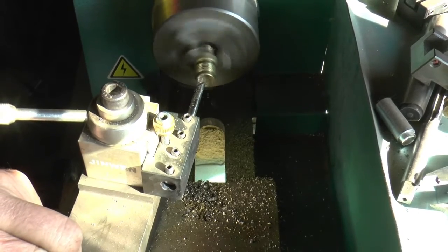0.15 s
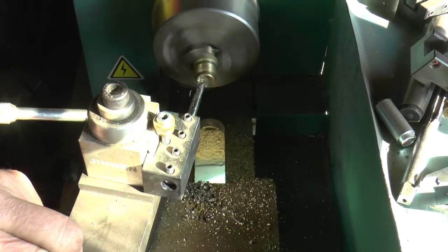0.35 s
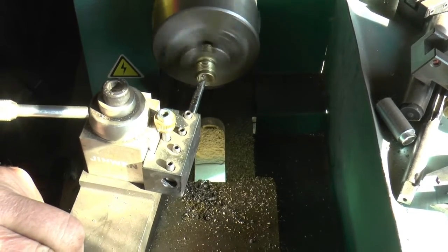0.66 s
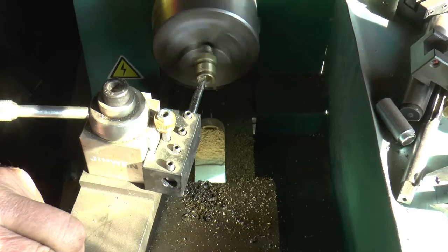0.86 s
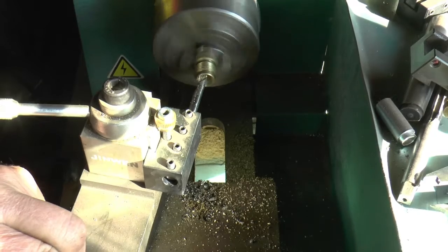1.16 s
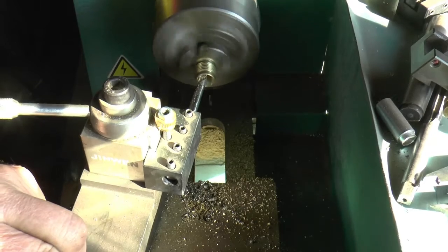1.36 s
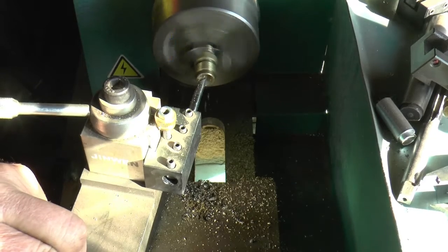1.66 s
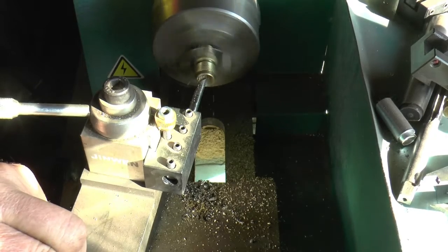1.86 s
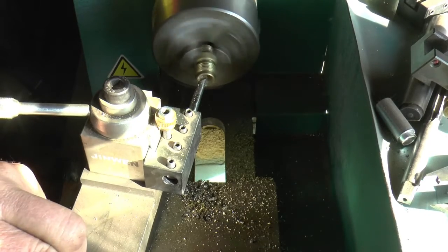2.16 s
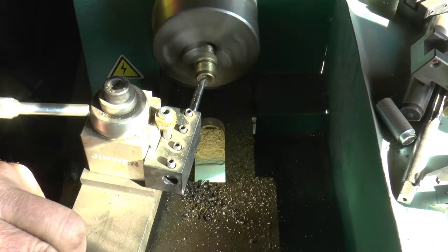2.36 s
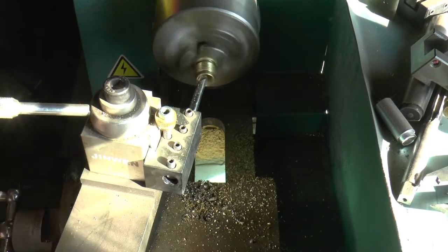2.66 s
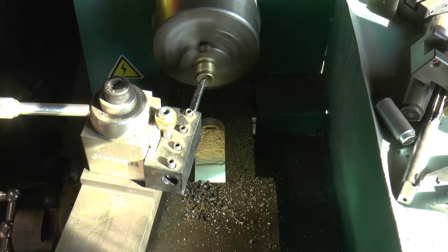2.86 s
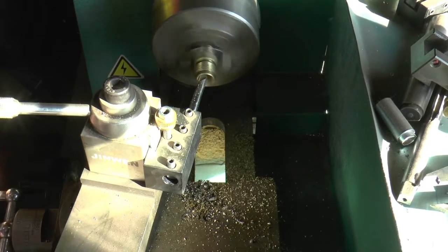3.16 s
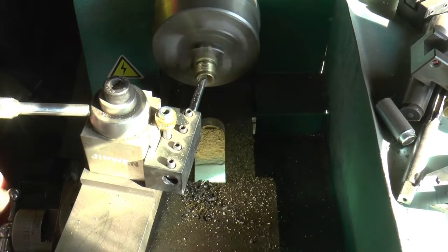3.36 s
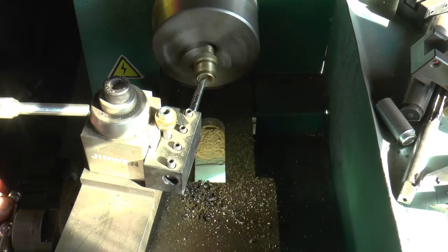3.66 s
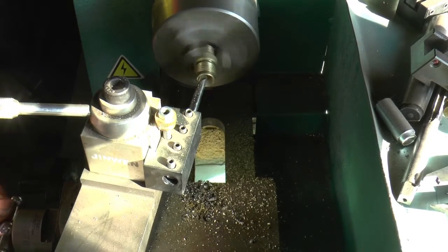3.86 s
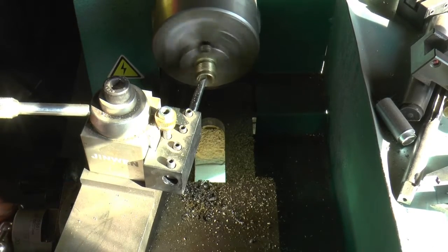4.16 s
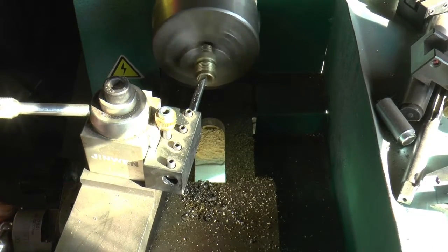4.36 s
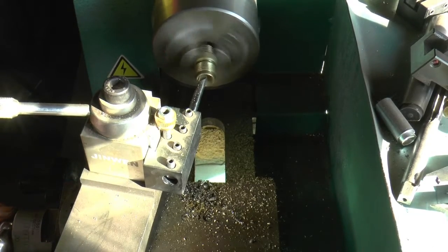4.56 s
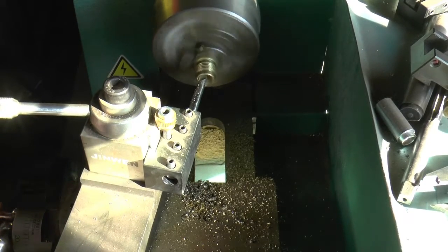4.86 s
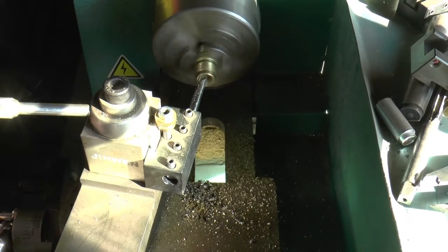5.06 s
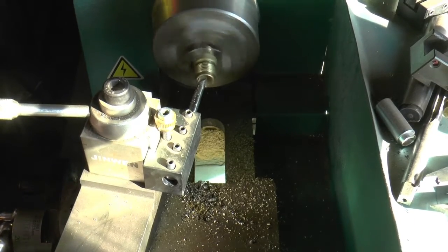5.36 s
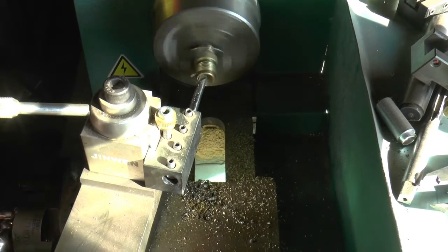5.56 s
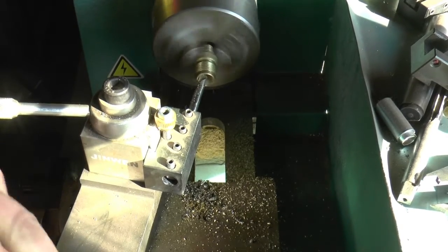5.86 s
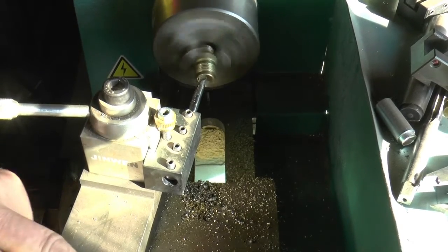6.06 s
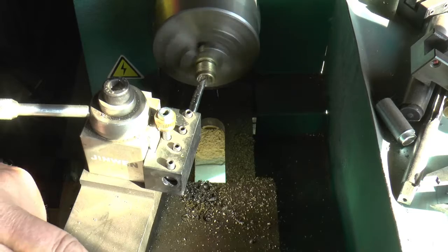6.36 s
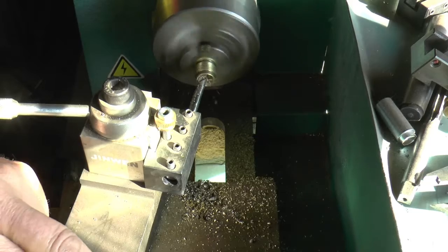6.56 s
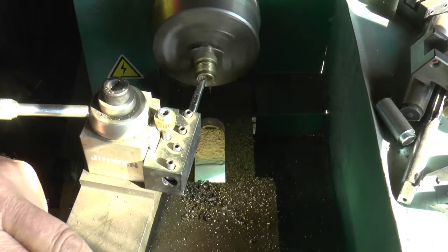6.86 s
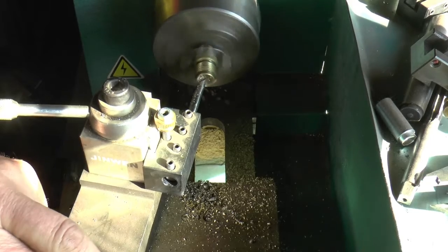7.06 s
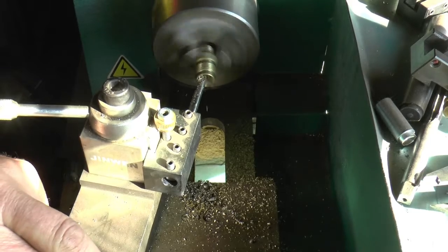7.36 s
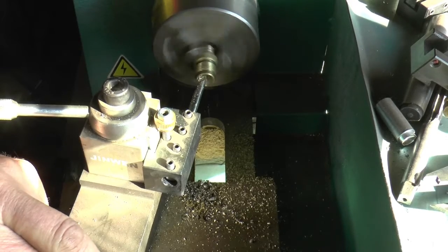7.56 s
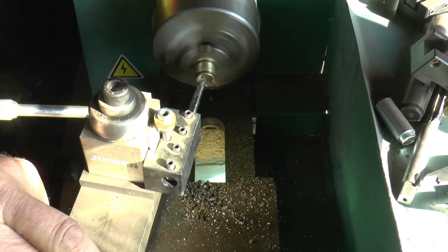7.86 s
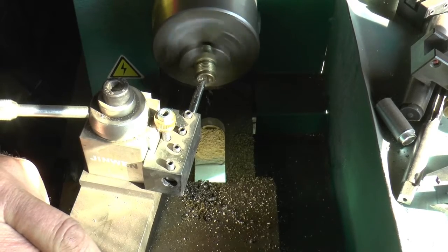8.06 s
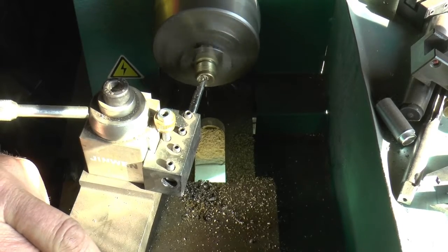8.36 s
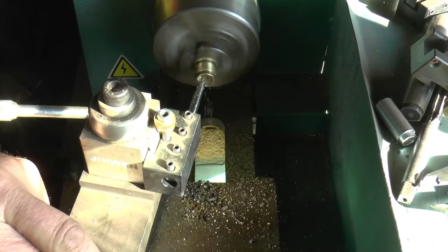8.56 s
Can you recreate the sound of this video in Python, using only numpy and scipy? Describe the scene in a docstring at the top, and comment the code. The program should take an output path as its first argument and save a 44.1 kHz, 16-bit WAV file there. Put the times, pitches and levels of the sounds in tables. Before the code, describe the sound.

A benchtop lathe runs throughout, heard close in stereo: a midrange gear and casting rumble, thin wavering motor whines and weak uneven bench thuds. From 0 to 1 s the boring bar gives faint, rough, narrow ringing and brief chirps near 2.3 kHz amid scraping and fine hiss. It quietens around 1.2 s, then stronger chirps stutter from 1.5 to 2.6 s. From about 2.65 to 5.1 s they join into a long, piercing squeal, nearly steady in pitch, faltering rapidly around 3.5-4 and 4.4-4.9 s, with overtones brightening while the machine noise sinks beneath it. A loud last burst comes near 5.05 s, then ragged chirps until 6.3 s. Afterwards the ring loosens, drops slightly and weakens; the running rumble returns forward, with gritty scrape, hiss and scattered metal chip ticks from 7.3 s until the cut-off at 8.7 s.

```python
"""A thin boring bar rings near 2.3 kHz in a small brass part on a benchtop lathe, close to a stereo microphone:
a rough narrow noise while the cut only shakes it, or pitched chirps and one long clean squeal with overtones.
Around it the cut scrapes and hisses as noise through resonances, and chips tick as short noise bursts.
Behind, the motor and gears whine as wavering tones, the castings rumble and the bench thuds as shaped noise."""
import sys
import numpy as np
from scipy import signal
from scipy.fft import rfft, irfft
from scipy.io import wavfile
from scipy.ndimage import uniform_filter1d

SR = 44100
rng = np.random.default_rng(int(sys.argv[2]) if len(sys.argv) > 2 else 0)


def generate_wav(signal):
    """Clip the signal to [-1, 1] and save it as 16-bit WAV at the path in sys.argv[1]."""
    frames = np.transpose(np.atleast_2d(signal))
    scaled = np.clip(frames, -1, 1) * 32767
    pcm = np.round(scaled).astype(np.int16)
    wavfile.write(sys.argv[1], SR, pcm)


N = 384552
T = np.arange(N) / SR  # s
HZ = np.maximum(np.arange(N // 2 + 1) * SR / N, 1)


def undb(db):
    """dB to gain."""
    return 10 ** (np.asarray(db) / 20)


def curves(table):
    """Each column of a table after the first, joined by straight lines in time."""
    s, *columns = np.transpose(table)
    return [np.interp(T, s, c) for c in columns]


def colour(points):
    """Gain at every frequency from (Hz, dB) points, joined on a log frequency axis."""
    hz, db = np.transpose(points)
    return undb(np.interp(np.log(HZ), np.log(hz), db))


def filtered(x, points):
    """A sound with its spectrum multiplied by a colour."""
    return irfft(rfft(x) * colour(points), N)


def walk(rate):
    """Random levels held 1 / rate s and slewed twice; spread near 1."""
    hold = int(SR / rate)
    steps = np.repeat(rng.standard_normal(N // hold + 1), hold)
    return 1.318 * uniform_filter1d(uniform_filter1d(steps, hold), hold)[:N]


# Stereo width of the noises by frequency. Each row: frequency in Hz, side minus mid in dB.
STEREO_WIDTH = [(25, 0), (60, -2), (130, 5.5), (200, -8.5), (380, -10.5), (700, -19.5), (900, -9.5),
                (1290, -16.5), (2600, -10), (3300, -16.5), (4400, -18.5), (5400, -23.5), (6500, -49),
                (8500, -7), (10000, -49)]
# How far the noises lean to one side. Each row: frequency in Hz, left minus right in dB.
LEFT_LEAN = [(60, -1.5), (125, -1.5), (250, -2), (500, 0), (1000, -1), (2000, -0.5), (16000, -0.5)]


def shaken(points, modes, lo_hz, hi_hz):
    """Noise through a broad spectrum and its resonances, mid rms 1 from lo to hi; unrelated noise feeds the side."""
    power = 1 + sum(undb(2 * db) / (1 + (2 * (HZ - hz) / width) ** 2) for hz, width, db in modes)
    shape = colour(points) * np.sqrt(power)
    in_band = (HZ > lo_hz) & (HZ < hi_hz)
    shape = shape / np.sqrt(2 * np.sum(shape[in_band] ** 2) / N)
    mid = rfft(rng.standard_normal(N)) * shape
    side = rfft(rng.standard_normal(N)) * shape * colour(STEREO_WIDTH)
    pan = np.sqrt(colour(LEFT_LEAN))
    return irfft(np.array([(mid + side) * pan, (mid - side) / pan]), N)


def ports(size, phase, pan_db, lead):
    """A tone of rms size at two microphone ports: left louder by pan_db and ahead by lead radians."""
    half = np.array([[.5], [-.5]])
    return np.sqrt(2) * size * undb(pan_db * half) * np.sin(phase + lead * half)


def shake(width_hz):
    """Random blows of the cut: a complex envelope as wide as the mode, rms 1."""
    pole = np.exp(-np.pi * width_hz / SR)
    blows = rng.standard_normal(N) + 1j * rng.standard_normal(N)
    return signal.lfilter([np.sqrt((1 - pole ** 2) / 2)], [1, -pole], blows)


# Pitch of the bar, higher the harder it bites. Each row: time in seconds, frequency in Hz.
BAR_PITCH = [(0, 2295), (1.3, 2305), (1.56, 2315), (1.65, 2330), (1.78, 2320), (1.83, 2338), (2.0, 2348),
             (2.07, 2330), (2.12, 2303), (2.19, 2344), (2.24, 2335), (2.29, 2310), (2.39, 2342),
             (2.5, 2338), (2.62, 2350), (2.72, 2341), (2.92, 2356), (3.1, 2353), (3.42, 2361), (3.64, 2354),
             (3.89, 2370), (4.06, 2351), (4.25, 2349), (4.45, 2330), (5.11, 2329), (5.15, 2338),
             (5.25, 2302), (5.34, 2335), (5.39, 2300), (5.48, 2335), (5.65, 2345), (5.72, 2325),
             (5.78, 2332), (5.84, 2304), (5.9, 2302), (5.96, 2345), (6.03, 2305), (6.16, 2292), (6.2, 2312),
             (6.29, 2270), (6.4, 2255), (6.5, 2225), (7.3, 2225), (7.8, 2250), (8.2, 2215), (8.72, 2250)]
# The bar while the cut only shakes it.
# Each row: time in seconds, level in dB rms outside the pitched spells, share of power heavily damped (0-1).
LOOSE_BAR = [(0, -23, 0.7), (.14, -40, 0.5), (.2, -31, .3), (.42, -32.5, 0.3), (.47, -34, .2),
             (.62, -40, 0.4), (.67, -31, 0.5), (1.2, -44, 1), (1.5, -27, .6), (1.57, -30.5, .4),
             (2.0, -27.5, 0.1), (2.42, -25.5, 0.5), (2.5, -26, 0.6), (2.65, -35, 0.5), (5.05, -29.5, 0.8),
             (5.2, -25.5, 0.94), (5.42, -25.5, 0.78), (5.54, -33, .6), (5.62, -28, 0.9), (5.72, -24.5, 0.7),
             (5.9, -22.5, .8), (5.98, -30.5, .7), (6.17, -23, 0.9), (6.32, -26, 0.3), (6.75, -33, 0.5),
             (7.15, -39, .6), (7.27, -30.5, 0.9), (7.75, -35.5, 0.7), (8.2, -32, 0.5), (8.72, -32, 0.7)]
# Spells in which the bar sounds pitched: short chirps, weak or strong, and one long squeal.
# Each row: start in seconds, length in seconds, level in dB before swell, falter and flicker.
PITCHED_SPELLS = [(0.004, 0.027, -34), (0.059, 0.02, -22.5), (0.166, 0.038, -27), (0.205, 0.028, -32),
                  (0.233, 0.049, -27), (0.283, 0.065, -30), (.35, 0.06, -32), (0.41, 0.02, -24),
                  (0.646, 0.032, -32), (.7, 0.034, -35), (.775, 0.041, -35), (.855, .03, -33),
                  (0.935, 0.041, -30.5), (1.34, .035, -29), (1.385, .03, -31), (1.467, 0.075, -31),
                  (1.552, 0.012, -19), (1.58, 0.02, -23), (1.634, 0.044, -18), (1.708, 0.027, -19),
                  (1.771, 0.028, -19), (1.802, 0.035, -18), (1.865, 0.012, -22), (2.065, 0.017, -17),
                  (1.921, 0.059, -27), (1.982, 0.025, -22.5), (2.105, 0.023, -22), (2.175, 0.073, -19),
                  (2.32, 0.034, -27), (2.39, 0.034, -28), (2.443, 0.057, -17.5), (2.508, 0.045, -26),
                  (2.562, 0.018, -29), (2.594, 0.046, -30), (2.65, 0.16, -18), (2.841, 2.094, -18),
                  (4.949, 0.018, -17), (4.968, 0.048, -23), (5.032, 0.11, -12.5), (5.202, 0.042, -20),
                  (5.274, 0.042, -16.5), (5.303, 0.014, -21), (5.33, 0.01, -18), (5.397, 0.039, -17.5),
                  (5.463, .03, -22), (5.555, .03, -25), (5.602, 0.063, -28), (5.683, .025, -22),
                  (5.714, 0.024, -18), (5.752, 0.025, -15), (5.795, 0.017, -14), (5.816, 0.049, -16),
                  (5.867, 0.02, -20), (5.9, 0.018, -13), (5.972, 0.013, -19), (6.062, 0.018, -17),
                  (6.153, 0.038, -20), (6.213, .015, -21), (6.235, 0.033, -21), (6.303, 0.018, -19)]
ATTACK_S, RELEASE_S = 0.013, 0.018
TAMED_DB = -3.5  # the random shaking is weaker during the pitched spells
# The pitched sound falters for a moment, mostly once a spindle turn.
# Each row: time in seconds, depth in dB, pitch kick in Hz.
FALTERS = [(2.203, 4, 1), (2.655, 3, 8), (2.75, 2, -3.5), (3.5, 2.5, 4), (3.584, 6.5, 9),
           (3.669, 10.5, 15.5), (3.746, 4.5, 10), (3.83, 3, 9.5), (3.92, 7, 11), (4.007, 9, 14),
           (4.11, 3.5, 1), (4.361, 10, -12), (4.431, 9.5, -13.5), (4.53, 4.5, -8), (4.611, 8, -8.5),
           (4.693, 6.5, -8), (4.77, 9, -12.5), (4.83, 8, -8), (4.867, 27, -1), (5.083, 5, -8)]
FALTER_S = 0.014  # time from the middle of a falter to 1/e of its depth
# The long squeal swells and sags; the last level stays on the chirps after it.
# Each row: time in seconds, level change in dB.
SQUEAL_SWELL = [(2.84, -3), (2.865, 3), (2.89, -0.5), (2.93, -1.5), (2.96, 1), (3.1, 0.5), (3.29, 1.5),
                (3.34, -1.5), (3.41, 1), (3.45, -1), (3.64, 0.5), (3.85, -2), (4.1, 2), (4.28, -0.5),
                (4.38, -1.5), (4.75, -0.5), (4.86, 0), (4.91, 1.5), (4.95, -7)]
# Outside this span the chirps are ragged: end of ragged, start of steady, end of steady, start of ragged, in s.
STEADY_SPAN = [2.4, 2.46, 5.12, 5.18]
# Pitch spread of the ragged chirps in Hz: before, then after the long squeal.
RAGGED_PITCH = [12, 22]
RAGGED_PER_S, RAGGED_DB = 130, 1.8
# Overtones as the tip leaves the metal.
# Each row: time in seconds, then the levels in dB rms of the 2nd, 3rd, 4th, 5th and 6th before falter and flicker.
OVERTONE_LEVELS = [(2.3, -48, -60, -59, -60, -66), (2.7, -59, -62, -58, -60, -66),
                   (2.85, -48, -55, -51, -48, -64), (3.05, -47, -48, -47, -47, -59),
                   (3.3, -56, -44, -49, -51, -62), (3.42, -34.5, -47, -35, -48, -42),
                   (3.55, -39.5, -43, -40.5, -50, -50), (3.7, -51, -47, -43.5, -52, -55),
                   (3.8, -39, -44, -41.5, -51, -55), (3.9, -36.5, -43, -40.5, -51, -55),
                   (4.22, -36.5, -41, -44, -48, -58), (4.3, -30.5, -39.5, -47, -53, -58),
                   (4.48, -28, -40.5, -42, -61, -57), (4.85, -31.5, -36.5, -47, -53, -58),
                   (5.12, -28.5, -42, -39, -45, -58), (5.2, -40.5, -60, -59.5, -54, -66)]
# For the 2nd to 6th overtone: the share of each falter's depth in dB that it follows.
FALTER_SHARE = [0.2, 0.34, 0.37, .4, .4]
# For the 2nd to 6th overtone: its own flicker in dB.
OVERTONE_FLICKER = [2.8, 3.4, 3.4, 4.2, 4]
OVERTONE_JITTER_RAD = .6  # the tip never leaves the metal the same way twice


def bar():
    """The bar's bending mode: a narrow noisy ring, or a pitched tone with overtones."""
    hz = curves(BAR_PITCH)[0]
    grip = np.ones(N)
    for s, depth_db, kick_hz in FALTERS:
        gap = np.exp(-((T - s) / FALTER_S) ** 2)
        grip *= 1 - (1 - undb(-depth_db)) * gap
        hz += kick_hz * gap

    on, pitched = np.zeros(N), np.zeros(N)
    for s, length, db in PITCHED_SPELLS:
        rise = (T - s) / ATTACK_S + .5
        fall = (s + length - T) / RELEASE_S + .5
        gate = np.clip(np.minimum(rise, fall), 0, 1)
        on = np.maximum(on, gate)
        pitched = pitched + gate * undb(db)
    lingering = np.minimum(2 * uniform_filter1d(on, size=1300), 1)  # overtones bridge the shortest gaps

    ragged = 1 - np.interp(T, STEADY_SPAN, [0, 1, 1, 0])
    ragged_hz = np.interp(T, STEADY_SPAN[1:3], RAGGED_PITCH) * ragged * walk(RAGGED_PER_S)
    phase = 2 * np.pi * np.cumsum(hz + 3.09 * walk(40) + ragged_hz) / SR

    swell_db = curves(SQUEAL_SWELL)[0] * (T > SQUEAL_SWELL[0][0])
    tone = pitched * grip * undb(swell_db + 0.91 * walk(29.68) + RAGGED_DB * ragged * walk(90))
    loose_db, damped = curves(LOOSE_BAR)
    damped = np.clip(damped, 0, 1)
    loose = np.sqrt(1 - damped) * shake(47) + np.sqrt(damped) * shake(87)  # mode widths in Hz
    envelope = tone + undb(loose_db + TAMED_DB * on) * loose
    ring = ports(np.abs(envelope), phase + np.angle(envelope), 0.29, -0.18)

    for k, over_db in enumerate(curves(OVERTONE_LEVELS)):
        size = lingering * grip ** FALTER_SHARE[k] * undb(over_db + OVERTONE_FLICKER[k] * walk(120))
        jitter = OVERTONE_JITTER_RAD * walk(90) + 2 * np.pi * rng.random()
        ring += ports(size, (k + 2) * phase + jitter, -0.25, 0.057)
    return ring


# Centres in Hz of the neighbouring bands in which the scrape changes colour.
SHIFT_BANDS = [2800, 3400, 4100, 5000, 6000]
SHIFT_DB, SHIFT_PER_S = 1.5, 5


def shifting(x):
    """Split into neighbouring bands whose levels wander on their own."""
    spectrum = rfft(x)
    place = np.interp(np.log(HZ), np.log(SHIFT_BANDS), np.arange(len(SHIFT_BANDS)))
    out = 0
    for k in range(len(SHIFT_BANDS)):
        band = irfft(spectrum * np.clip(1 - np.abs(place - k), 0, 1), N)
        out = out + band * undb(SHIFT_DB * walk(SHIFT_PER_S))
    return out


# Spectrum of the scraping cut. Each row: frequency in Hz, relative density in dB per Hz.
SCRAPE_SPECTRUM = [(2000, -21), (3400, -2), (4060, -4), (4780, -1.5), (5280, -2), (5400, -6), (5790, -4.5),
                   (6280, -1), (7000, -24), (9100, -48), (15400, -120)]
# Guard and workpiece, ringing in scrape and hiss. Each row: frequency in Hz, width in Hz, dB over the noise.
HOLDER_MODES = [(4260, 50, 3), (4790, 90, 6), (5275, 60, 7), (5530, 50, 3), (8440, 60, 4), (9230, 120, 5),
                (9800, 100, 4), (10890, 60, 3), (11710, 70, 4), (11930, 70, 4), (12250, 50, 4),
                (12720, 60, 4), (13050, 80, 3)]
SCRAPE_DB = -7.5  # relative to the running noise


def scrape(scrape_db, chips_db):
    """The tip tears brass: noise through guard and workpiece that swells with the chip load."""
    tearing = shifting(shaken(SCRAPE_SPECTRUM, HOLDER_MODES, 3800, 6740))
    return tearing * undb(SCRAPE_DB + 0.39 * scrape_db + chips_db)


# Tool post modes that the cut drives hardest, before the level changes below.
# Each row: frequency in Hz, width in Hz, dB over their faint skirts.
POST_MODES = [(4493, 30, 34.8), (4593, 53, 34.3), (5970, 35, 23), (6095, 50, 32.4), (6240, 110, 19)]
# Level of the post mode near 4.6 kHz, which dips after the squeal, recovers and dips again.
# Each row: time in seconds, level change in dB.
MID_POST_LEVEL = [(0, 0), (5.1, -1), (5.4, -4), (6.0, -3), (7.0, 1), (7.6, -3), (8.72, 0)]
POST_DB = -13  # relative to the running noise
LOW_POST_DUCK_DB = -7.5  # the lower post modes while the long squeal holds


def post_modes(scrape_db):
    """Noise rattles the tool post's modes; the lower ones quieten over the span of the long squeal."""
    skirts = [(3000, -30), (4000, 4.5), (6500, 0.5), (8000, -30)]  # (Hz, dB)
    post = shaken(skirts, POST_MODES, 3800, 6600)
    low = filtered(post, [(5100, 0), (5500, -60)])
    squealing = np.interp(T, [2.45, 2.6, 5.1, 5.2], [0, 1, 1, 0])
    post = post + low * (undb(LOW_POST_DUCK_DB * squealing) - 1)
    mid = filtered(post, [(4500, -40), (4550, 0), (4660, 0), (4720, -40)])
    post = post + mid * (undb(curves(MID_POST_LEVEL)[0]) - 1)
    return post * undb(POST_DB + 1.6 * scrape_db + 2.0 * walk(40))


# Spectrum of the fine hiss. Each row: frequency in Hz, relative density in dB per Hz.
HISS_SPECTRUM = [(5000, -13), (6600, -1), (7100, -1.5), (8900, -3.5), (9500, 0), (10800, -2.5), (11900, 3),
                 (13000, -12), (13500, -6), (14800, -7.5), (15300, -15), (16000, -18)]
HISS_DB = -20  # relative to the running noise
TOP_FOLLOWS = 0.35  # the highest hiss takes only this share of a rise in dB


def fine_hiss(hiss_db, chips_db):
    """Fine noise of the cut above the scrape; its highest part rises less."""
    hiss = shaken(HISS_SPECTRUM, HOLDER_MODES, 7460, 8950) * undb(HISS_DB + chips_db)
    top = filtered(hiss, [(10300, -60), (10900, 0)])
    top_db = TOP_FOLLOWS * np.maximum(hiss_db, 0) + np.minimum(hiss_db, 0)
    return (hiss - top) * undb(hiss_db) + top * undb(top_db)


# Chips that tick on the tool post. Each row: start in seconds, noise level at the onset in dB before the band filter.
CHIP_TICKS = [(0.84, -17), (1.271, -15), (1.342, -22), (1.881, -23), (2.571, -26), (3.352, -25),
              (3.79, -27), (3.958, -26), (4.049, -26), (4.148, -26), (4.394, -22), (4.998, -21),
              (5.64, -17), (7.265, -20), (7.347, -19), (7.518, -17), (7.7, -23), (8.13, -19), (8.57, -21)]


def ticks():
    """Each chip is a short rattle of noise in the range of the tool post."""
    out = np.zeros(N)
    fade = np.exp(-np.arange(1200) / (0.013 * SR))
    for s, db in CHIP_TICKS:
        i = int(s * SR)
        out[i:i + len(fade)] += undb(db) * fade * rng.standard_normal(len(fade))
    band = signal.butter(3, [2600, 6000], "bandpass", fs=SR, output="sos")
    return signal.sosfilt(band, out)


RUN_REF_DB = -26  # running noise at which the motor's tones have the levels given here
# Rotor slot harmonics and neighbours at twice the mains, in Hz.
WHINE_PITCHES = [1464, 1704, 1823.8, 1943.8, 2615.75, 2735.7, 2975.6, 3647.7]
# Each row, one whine: dB rms midway, left minus right in dB, left lead in radians, drift in dB per second.
WHINE_LEVELS = [(-49.5, 0, 0, 0), (-54, 0, 0, 0), (-42.5, -1, 0, 0), (-49, 0, 0, 0), (-36.5, 0, .04, .6),
                (-36, 1.4, .36, -.3), (-51, 0, 0, 0), (-46.5, 0, .03, -.2)]
# Narrow gear and belt tones, in Hz.
GEAR_PITCHES = [498.7, 528, 640.5, 672.2, 695.8, 829.3, 963.6]
# Levels of the gear and belt tones, in dB rms.
GEAR_LEVELS = [-52, -48, -44, -44, -40, -46.5, -53.5]
# Two close gear tones beat: the upper one, then the beat, its first swell and the lower one's relative level.
HUM_HZ, HUM_DB = 312.1, -42
BEAT_HZ, BEAT_S, LOWER_DB = 5.883, .066, -4


def motor():
    """Motor, gears and belt: steady tones that waver a little in level and phase, and a beating pair."""
    out = 0
    for hz, (db, pan_db, lead, drift) in zip(WHINE_PITCHES, WHINE_LEVELS):
        phase = 2 * np.pi * (hz * T + rng.random()) + 0.24 * walk(3.05) + 0.46 * walk(25)
        level_db = db + drift * (T - T[-1] / 2) + 0.93 * walk(2.54) + 1.87 * walk(30)
        out = out + ports(undb(level_db), phase, pan_db, lead)
    for hz, db in zip(GEAR_PITCHES, GEAR_LEVELS):
        phase = 2 * np.pi * (hz * T + rng.random()) + 1.18 * walk(4)
        out = out + ports(undb(db + 2.35 * walk(5) + 3.5 * walk(18)), phase, -.8, 0.38)
    upper = 2 * np.pi * HUM_HZ * T
    lower = upper - 2 * np.pi * BEAT_HZ * (T - BEAT_S)
    out = out + ports(undb(HUM_DB), upper, -1.9, 0.12)
    out = out + ports(undb(HUM_DB + LOWER_DB + 1.1 * walk(2.66)), lower, -1.7, 0.092)
    return out * undb(-RUN_REF_DB)


# Spectrum of gears and belt. Each row: frequency in Hz, relative density in dB per Hz.
RUMBLE_SPECTRUM = [(41, -63), (70, -40), (190, -29.5), (225, -21), (304, -8), (429, -11), (559, -12),
                   (670, -3.5), (901, -13.5), (1410, -17.5), (2020, -10), (2680, -9.5), (2950, -17.5),
                   (3600, -19.5), (4680, -33), (7920, -120)]
# Castings, guard and tray. Each row: frequency in Hz, width in Hz, dB relative to the rumble.
CASTING_MODES = [(307.5, 3.7, 10), (367, 9.1, 1.5), (496.6, 20.5, 8.5), (534, 8.7, -9), (593, 55, 5.5),
                 (643, 3.5, 12.5), (673.8, 30.3, 12), (711.6, 6.8, 11.5), (736, 23, -12), (840, 5.4, 7),
                 (944, 6.7, 6), (1069, 32, 7.5), (1121, 20, 14), (1177, 38, 5), (1265, 49, 10.5),
                 (1343, 20, 9), (1401, 31, 15), (1443, 57, 9), (1614, 21, 10), (1675, 27, 3.5),
                 (2424, 27, 8), (2500, 30, 4), (2603, 61, -1), (2800, 65, -1.5), (2987, 19, 11),
                 (3642, 35, 13.5)]


def casting_rumble():
    """Gears and belt shake the castings: noise through their resonances."""
    return shaken(RUMBLE_SPECTRUM, CASTING_MODES, 400, 2480) * undb(0.92 * walk(25) + 0.45 * walk(11))


# Level of the bench thud. Each row: time in seconds, dB over its usual share.
THUD_LEVEL = [(0, 0), (.63, -2), (1.6, 8), (2.3, 1), (3.13, 0), (3.98, 0), (4.47, 5), (4.93, 0), (5.05, 13),
              (5.17, -8), (5.73, -4), (5.85, -9), (6.26, -4), (6.41, -5), (7.53, 4.5), (7.8, -1.5),
              (8.72, 4)]
BASS_DB = -38  # relative to the running noise


def bench_thud():
    """Low noise of the bench, uneven in level."""
    spectrum = [(12, -20), (30, -5), (70, -5.5), (140, -7.5), (200, -7.5), (300, -40)]  # (Hz, dB per Hz)
    level_db = BASS_DB + curves(THUD_LEVEL)[0] + 3.5 * walk(6.2) + 1.7 * walk(12)
    return shaken(spectrum, [], 20, 100) * undb(level_db)


# The running lathe as heard, sinking while the bar squeals.
# Each row: time in seconds, running noise in dB, drive of the cut in dB (scrape and post each scale it),
# fine hiss in dB over its usual share (the highest hiss scales its rises).
RUNNING = [(0, -28, 3, 1), (.4, -24, -3, -2), (.47, -30.5, -2, -2.5), (.6, -28.5, -0.5, 0.5),
           (.68, -26, -2, -0.5), (1.2, -25.5, -6, -1.5), (1.36, -28.5, -0.5, 0.5), (1.5, -25.5, -4.5, -3),
           (1.6, -29, 1.5, 0.5), (1.9, -29.5, -1.5, -2), (2.25, -29.5, -1, -3), (2.4, -26, -0.5, -4.5),
           (2.5, -31, -2, -5), (2.64, -28.5, -6, -4.5), (2.74, -34.5, 3, -0.5), (2.95, -34, 0.5, -1),
           (3.4, -32.5, 5, 2.5), (3.65, -34.5, 3.5, 1), (3.8, -33, 5.5, 3), (4.25, -36.5, 9, 5),
           (4.55, -33.5, 8.5, 4.5), (4.85, -32, 8.5, 5.5), (5.1, -32.5, 8, 2.5), (5.45, -29.5, 5, 2),
           (5.54, -28.5, 0.5, 2.5), (5.585, -24.5, -2, -1.5), (5.72, -26, 2.5, 1.5), (5.95, -30.5, 3.5, 1),
           (6.05, -27, 5, 0.5), (6.2, -26, 6, 2), (6.4, -30, 6, 1.5), (6.95, -25.5, -1, -1),
           (7.7, -26, -0.5, 1), (8.05, -25, -2, -1), (8.4, -25.5, -0.5, -0.5), (8.72, -24.5, -0.5, 0)]
FLUTTER_DB, FLUTTER_PER_S = 0.49, 12  # the running noise flutters


def scene():
    """All but the bar and ticks share one running level; scrape and hiss swell with the chip load."""
    run_db, scrape_db, hiss_db = curves(RUNNING)
    chips_db = 1.0 * walk(45) + 0.71 * walk(14)
    cut = scrape(scrape_db, chips_db) + post_modes(scrape_db) + fine_hiss(hiss_db, chips_db)
    machine = motor() + casting_rumble() + bench_thud()
    running = undb(run_db + FLUTTER_DB * walk(FLUTTER_PER_S))
    return bar() + ticks() + running * (cut + machine)


ROUND_AT = .55  # amplitude where peaks round off
TOP_HZ = 15700


def record(dry):
    """The recorder rounds the loudest peaks and cuts the top."""
    rounded = ROUND_AT * np.tanh(dry / ROUND_AT)
    return signal.sosfilt(signal.ellip(12, .2, 70, TOP_HZ, fs=SR, output="sos"), rounded)


dry = scene()
out = record(dry)
generate_wav(out)
```